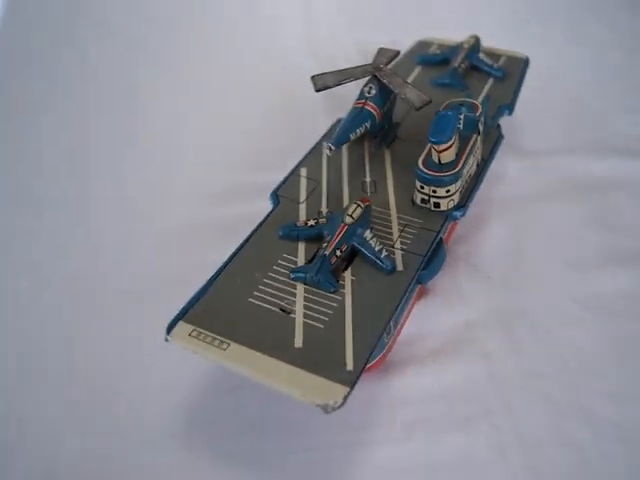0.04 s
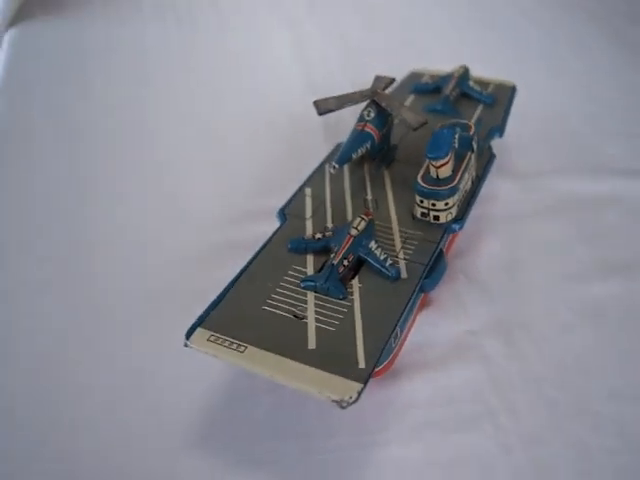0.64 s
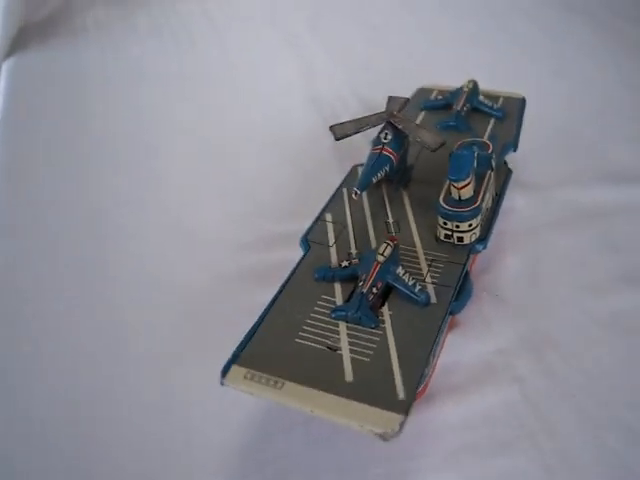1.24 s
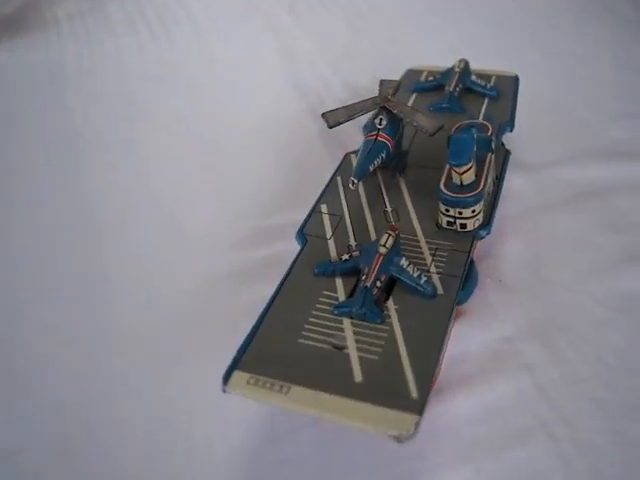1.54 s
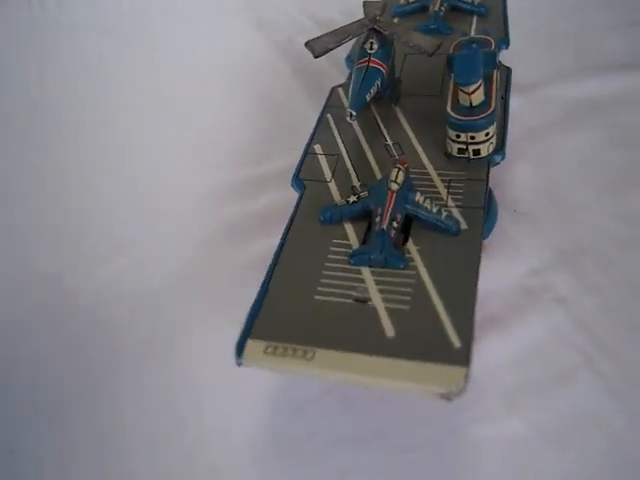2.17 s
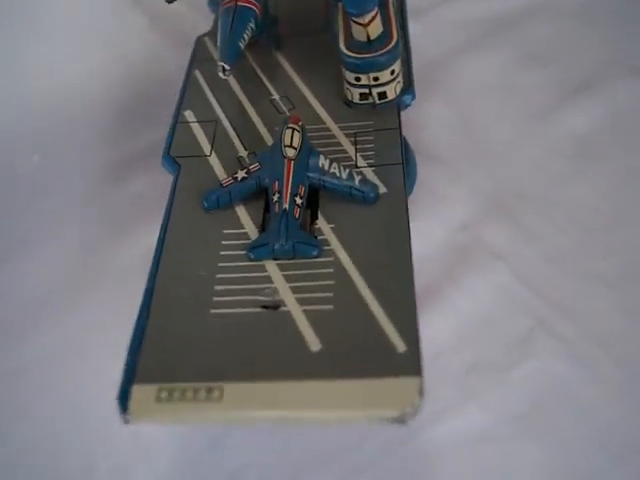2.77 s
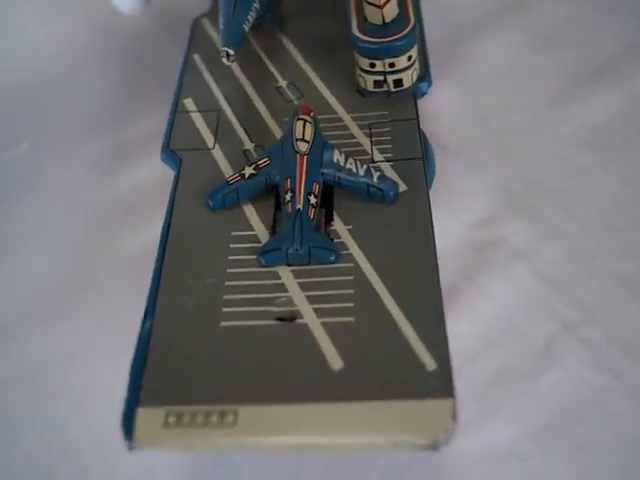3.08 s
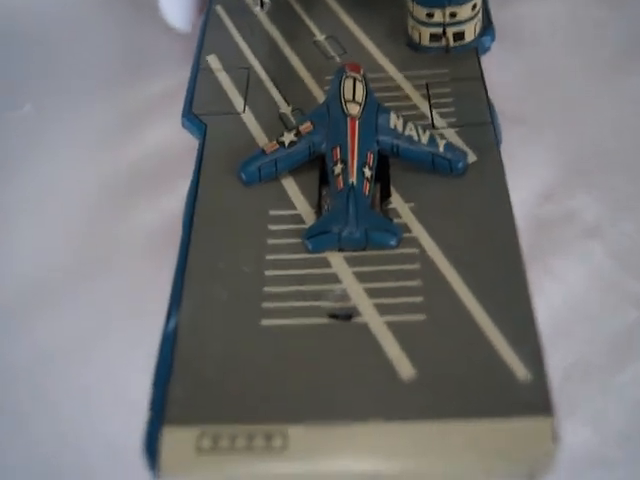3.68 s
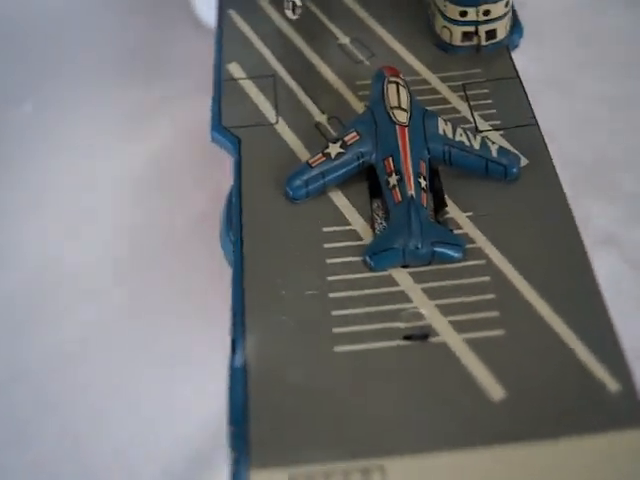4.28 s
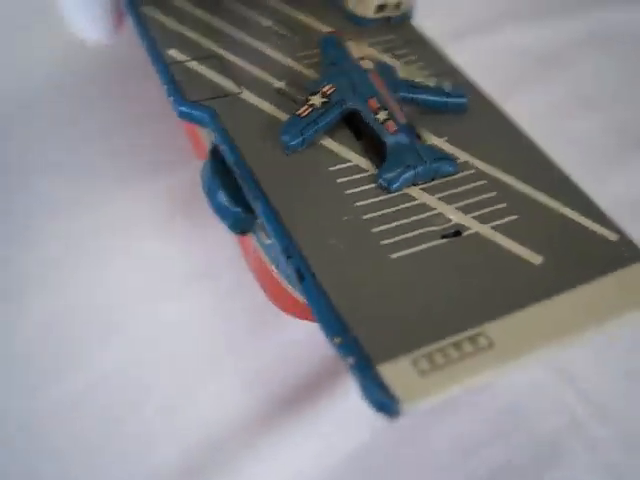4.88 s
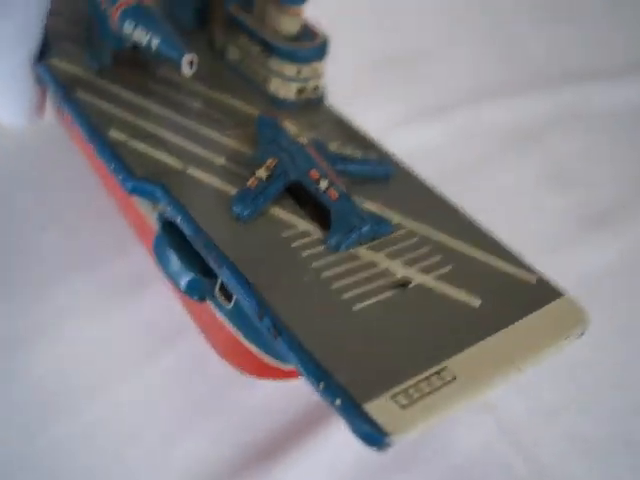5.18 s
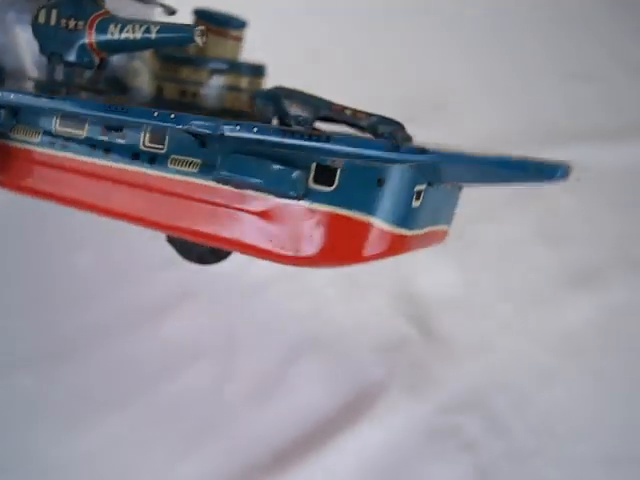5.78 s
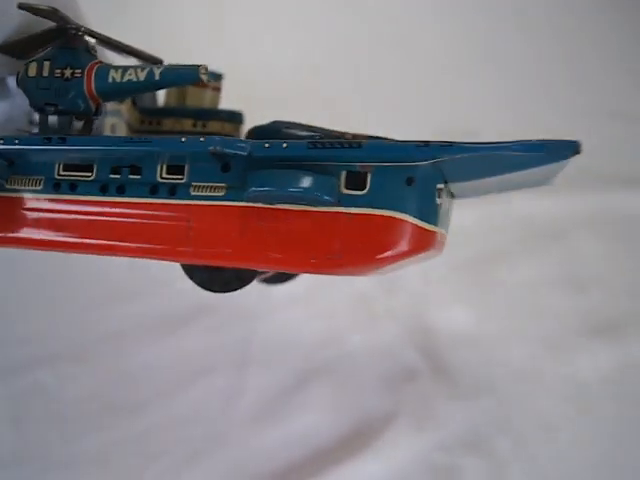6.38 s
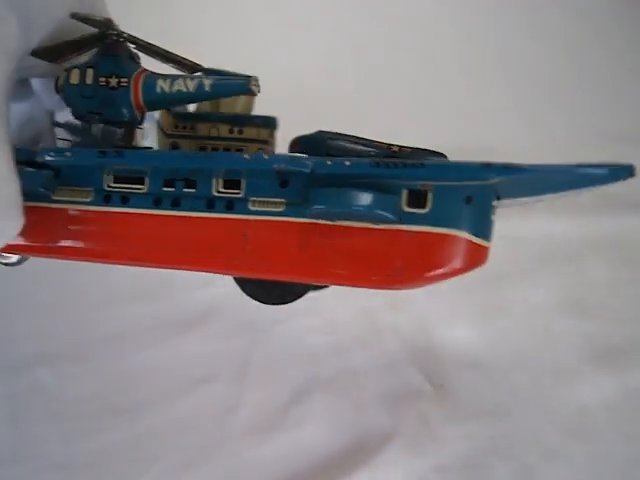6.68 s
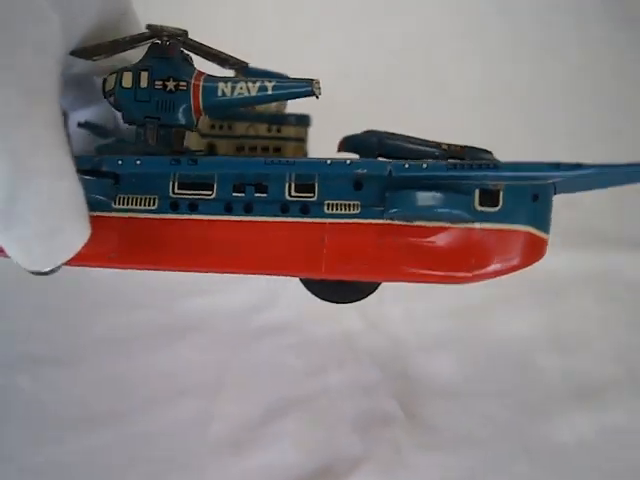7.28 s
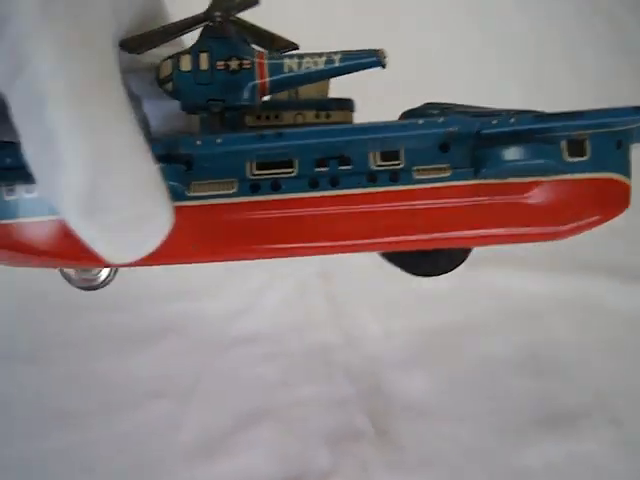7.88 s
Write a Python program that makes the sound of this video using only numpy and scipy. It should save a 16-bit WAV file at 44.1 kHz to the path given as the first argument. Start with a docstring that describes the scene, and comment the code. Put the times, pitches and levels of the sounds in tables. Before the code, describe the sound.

A faint hiss and the soft rub of a glove and cloth run throughout, as a tin toy is turned close to the microphone in a small, quiet room. A gritty scuff and a dull, light tap come at about 0.6 seconds, and another scuff at 1.6. The camera's autofocus stirs faintly at 1.2 seconds, then clicks irregularly from 1.9 to 3.9, quickest just before 3. Each move is a small scrape, a clack and a very short whirr ending in a tiny falling groan. At 3.7 seconds loose tin parts give a brief ringing clatter, the loudest moment, with more taps and a cloth rustle up to 4. Two tiny glove creaks and a scuff follow around 4.3 to 4.6. After a lull, focus clicks and whirrs return from 5.4 to 7 seconds, sharpest at 6.3 and 6.9. A last soft scuff comes at 7.6.

```python
"""A faint hiss and the rub of a glove and cloth come first: a hand turns a tin toy ship close to a camera
in a quiet room. Gritty scuffs swell and fade; loose tin parts tap and ring; the glove creaks on the tin.
The camera's autofocus keeps hunting: its gears scrape, take up with a clack, whirr briefly and brake with
a low falling groan. This vibration travels through the resonant housing to both microphone ports."""
import sys
import numpy as np
from scipy import signal
from scipy.fft import rfft, irfft, next_fast_len
from scipy.io import wavfile
from scipy.ndimage import uniform_filter1d, map_coordinates

SR = 44100
rng = np.random.default_rng(int(sys.argv[2]) if len(sys.argv) > 2 else 0)


def unload_wav(signal):
    """Save mono or channel-first audio to the path in sys.argv[1] as 16-bit WAV at rate SR, clipped to [-1, 1]."""
    wavfile.write(
        sys.argv[1],
        SR,
        np.round(np.clip(np.atleast_2d(signal).T, -1, 1) * 32767).astype(np.int16),
    )


N = 349713
T = np.arange(SR // 4) / SR  # time within one event, t/s


def amp(db):
    """Amplitude ratio of a level in decibels."""
    return 10 ** (np.asarray(db) / 20)

def unit(x, size=None):
    """Normalisation to rms 1 over the first size samples."""
    return x / np.sqrt(np.mean(x[..., :size] ** 2) + 1e-20)

def along(points, hz):
    """Interpolation of (f/Hz, value) points on a logarithmic frequency axis."""
    f, values = np.transpose(points)
    return np.interp(np.log(hz + 1), np.log(f + 1), values)

def wobble(rate):
    """Smooth random modulation, with rate knots a second."""
    knots = rng.standard_normal(int(N * rate / SR) + 4)
    return map_coordinates(knots, [np.arange(N) * rate / SR])

def filtered(x, response):
    """Linear filtering: the spectrum times a frequency response."""
    n = x.shape[-1]
    padded = 2 * next_fast_len(n // 2 + 4096)
    return irfft(rfft(x, padded) * response(np.fft.rfftfreq(padded, 1 / SR)), padded)[..., :n]

def causal(db):
    """The minimum-phase response with this gain."""
    cepstrum = irfft(np.log(amp(db) + 1e-6))
    half = len(cepstrum) // 2
    return np.exp(rfft(np.r_[cepstrum[0], 2 * cepstrum[1:half]], 2 * half))

def tilted(x, db_per_octave):
    """Spectral tilt: harder contacts are brighter."""
    return filtered(x, lambda hz: causal(db_per_octave * np.log2(np.clip(hz, 600, 7000) / 2000)))

def whitened(burst):
    """Whitening: a flatter force spectrum lets the struck body set the colour."""
    spectrum = rfft(burst, 2 * len(T))
    magnitude = np.abs(spectrum)
    return irfft(spectrum / (magnitude + .4 * magnitude.mean()))[:, :len(T)]

def add(track, start_s, sound):
    """Superposition of a sound on a track."""
    part = track[:, round(start_s * SR):][:, :sound.shape[-1]]
    part += sound[..., :part.shape[-1]]

# Notches of the port cavities: f/Hz, half-width/Hz, gain/dB
PORT_CAVITIES = [(1387, 167, -9.5), (2375, 154, -10.5), (3515, 280, -7)]
def ports(x):
    """Antiresonance: the hollows of the microphone ports absorb narrow bands."""
    gain_db = lambda f: sum(db * np.exp(-((f - hz) / width) ** 2) for hz, width, db in PORT_CAVITIES)
    return filtered(x, lambda f: causal(gain_db(f)))

# Likeness of left and right: f/Hz, correlation coefficient
CORRELATION = [(40, 1), (500, 0.41), (1000, 0.49), (1600, 0), (3000, 0.14), (4500, 0), (7000, 0.13),
               (12000, 0)]
def stereo_noise(spectrum):
    """Partial coherence: noise of rms 1, nearly mono in the bass."""
    def response(hz):
        angle = np.arccos(np.clip(along(CORRELATION, hz), -1, 1)) / 2
        return amp(along(spectrum, hz)) * [np.cos(angle), np.sin(angle)]
    mid, side = filtered(rng.standard_normal((2, N)), response)
    return unit(np.array([mid + side, mid - side]))

# Hiss spectrum: f/Hz, spectrum level/dB
HISS_SPECTRUM = [(20, 2), (95, -11.5), (135, -14), (175, -5), (520, 7), (610, -6), (980, -3.5), (1400, 1.5),
                 (1850, -2.5), (2400, -17), (3000, 2.5), (3500, -29), (4450, 1), (5900, -25), (7300, -9),
                 (14000, -21)]
def hiss(level_db=-62):
    """Stationary noise, coloured by the ports, forms a faint floor."""
    return amp(level_db) * ports(stereo_noise(HISS_SPECTRUM))

# Strength of rubbing: t/s, glove level/dB, cloth level/dB
RUBBING = [(0.0, -65.5, -60.5), (1.39, -64.5, -57.5), (1.99, -67, -62.5), (2.56, -69, -61.5),
           (2.98, -62, -64), (3.47, -60, -59.5), (3.75, -61.5, -54.5), (4.09, -58, -60), (4.44, -60.5, -63),
           (4.66, -68.5, -64), (5.3, -74, -63.5), (5.63, -65, -62), (6.67, -67, -60), (7.57, -65, -61.5),
           (7.93, -69, -62)]
# Pushes on the cloth: t/s, level/dB
CLOTH_PUSHES = [(.684, -53), (3.86, -45.5), (5.57, -60)]
# Friction spectra: f/Hz, spectrum level/dB
GLOVE_SPECTRUM = [(120, -47), (200, -7), (700, -9), (1700, -0.5), (4200, 0), (8000, -9), (14000, -40)]
CLOTH_SPECTRUM = [(100, -71), (220, -12), (480, -3.5), (620, -3), (800, 4.5), (1100, 4.5), (1400, -11),
                  (1900, -7.5), (4000, -6), (12000, -31.5)]
def glove_and_cloth(glove_gain_db=4.5, cloth_gain_db=-1, push_width_s=0.032):
    """Sliding friction: the glove rubs painted tin; the cloth rustles and swells where pushed."""
    t = np.arange(N) / SR
    times, *levels = np.transpose(RUBBING)
    glove_db, cloth_db = [np.interp(t, times, level) for level in levels]
    pushes = sum(amp(level) * np.exp(-.5 * ((t - at) / push_width_s) ** 2) for at, level in CLOTH_PUSHES)
    glove = amp(glove_db + glove_gain_db + 0.68 * wobble(rate=11)) * unit(stereo_noise(GLOVE_SPECTRUM))
    flutter = amp(2 * wobble(rate=25))
    cloth = (amp(cloth_db + cloth_gain_db) + pushes) * flutter * stereo_noise(CLOTH_SPECTRUM)
    return ports(glove + cloth)

# Spectrum of scuffs and gear scrapes: f/Hz, spectrum level/dB
SLIDE_SPECTRUM = [(130, -49), (250, 1), (600, -8), (1050, 3.5), (4300, 4), (6000, -4), (9000, -8.5),
                  (14000, -26.5)]
def slides(events, t60_s, grain_db=1.5):
    """Transient friction: gritty noise rises linearly and decays exponentially."""
    rise_s = 0.088 * t60_s
    shape = np.minimum(T / rise_s, 1) * amp(-60 * np.maximum(T - rise_s, 0) / t60_s)
    envelope = np.zeros((1, N))
    for peak_s, level in events:
        add(envelope, peak_s - rise_s, amp(level) * shape)
    return envelope * unit(ports(stereo_noise(SLIDE_SPECTRUM)) * amp(grain_db * wobble(rate=330)))

# Short gritty scuffs: t/s, level/dB
SCUFFS = [(0.568, -45), (1.569, -43.5), (3.567, -43), (3.878, -44), (4.567, -46), (4.592, -51), (4.85, -59),
          (5.08, -59), (6.381, -52), (6.568, -45), (7.569, -50)]
def scuffs():
    """Amplitude-modulated noise: short gritty scuffs swell and fade."""
    return slides(SCUFFS, t60_s=0.17)

# Loose parts striking the deck: t/s, level/dB, tilt/(dB per octave)
TIN_IMPACTS = [(0.6597, -50.5, -10.5), (0.673, -47.5, -10), (3.332, -54, -3.5), (3.667, -45, 5),
               (3.672, -25.5, 3.5), (3.676, -38, 0.5), (3.685, -39, 3), (3.696, -41, -5),
               (3.7167, -38.5, -3.5), (3.854, -41.5, -1.5), (3.875, -40.5, -1.5), (3.9871, -34, 4.5),
               (4.323, -48.5, 6), (4.332, -49, -5.5), (4.538, -53, -6.5)]
# Modes of the tin sheet: f/Hz, level/dB, T60/s
TIN_MODES = [(233, -21.5, 0.44), (530, -15, 0.13), (942, 1.5, 0.12), (1080, 2, 0.12), (1199, 1.5, 0.32),
             (1294, 1.5, 0.1), (1609, 8, 0.085), (1720, 4, .05), (1895, 15, 0.042), (1947, 9, 0.073),
             (2267, 0.5, 0.12), (2696, 0, 0.14), (3020, -5, 0.057), (3764, 12, 0.056), (3840, 10, 0.035),
             (4060, 21.5, 0.0068), (4380, 6, 0.019), (4920, -4, 0.032), (7900, -6, 0.045),
             (9700, -11, 0.025)]
# Contact noise: f/Hz, spectrum level/dB
CRACK_SPECTRUM = [(120, -43), (260, -14.5), (600, -8), (1200, 2), (1900, -1), (2700, -9.5), (3200, -4.5),
                  (4000, 5.5), (6000, -14), (8000, -13.5), (14000, -41)]
def tin_taps(crack_t60_s=0.029, crack_db=-1, gain_db=0.4, attack_s=0.00042):
    """Impact excitation: each contact cracks and rings the sheet's damped modes at new strengths."""
    out = np.zeros((2, N))
    hz, db, t60 = np.transpose(TIN_MODES)[:, :, None]
    for start, level, tilt in TIN_IMPACTS:
        strength = amp(db + 2 * rng.standard_normal(hz.shape))
        phase = 2 * np.pi * rng.random(hz.shape)
        # loose seams blur the ring
        drift = np.cumsum(rng.standard_normal((len(hz), len(T))), 1) * 0.042 * np.sqrt(hz / 2000)
        modes = strength * amp(-60 * T / t60) * np.sin(2 * np.pi * hz * T + phase + drift)
        ring = modes.sum(0) * (1 - np.exp(-T / attack_s))
        contact = rng.standard_normal(len(T)) + .5 * rng.standard_normal((2, len(T)))  # nearly mono
        contact *= amp(-60 * T / crack_t60_s)
        crack = ports(filtered(contact, lambda f: causal(along(CRACK_SPECTRUM, f))))
        tap = unit(ring, size=882) + amp(crack_db) * unit(crack, size=882)
        add(out, start, amp(level + gain_db) * unit(tilted(tap, tilt), size=882))
    return out

# Focus moves, each a scrape, clack, whirr and brake: t/s, duration/s, scrape level/dB, clack level/dB,
# clack tilt/(dB per octave), barrel f/Hz, brake level/dB
FOCUS_MOVES = [(1.1945, 0.1, -58, -49.5, -6, 1110, -44), (1.903, 0.053, -39.5, -32, 1.5, 1930, -50),
               (2.2973, 0.069, -57, -36, -5, 1120, -54.5), (2.565, 0.051, -44.5, -34, -2, 2020, -49),
               (2.631, 0.018, -55, -38.5, -4.5, 2010, -48.5), (2.766, 0.052, -52, -35.5, -2.5, 1930, -50),
               (2.832, 0.02, -51, -39, -3, 1900, -55), (2.851, 0.012, -44, -37.5, -1.5, 870, -56),
               (2.9665, 0.05, -59, -32.5, -1.5, 2000, -50), (3.0325, .009, -57, -30.5, -1.5, 1940, -66),
               (3.0414, 0.011, -52, -35, -2, 1940, -52), (3.5011, 0.064, -47, -32, -1, 900, -49.5),
               (3.72, 0.14, -60, -35, -0.5, 880, -44.5), (3.851, .02, -51, -36, 0, 3020, -57),
               (5.423, 0.14, -42, -39, -3.5, 1260, -58), (5.934, 0.11, -69, -54.5, -5, 1690, -46),
               (6.052, 0.032, -70, -47, -9, 1960, -45.5), (6.346, 0.049, -35, -32, -1.5, 2040, -50),
               (6.4747, 0.053, -39.5, -42, -5, 920, -46), (6.674, 0.16, -52, -55, 3, 1960, -44),
               (6.9266, 0.12, -34.5, -32.5, -1.5, 1990, -48.5)]
def gear_scrapes(lead_s=0.0035):
    """Sliding friction: the gears slip just before they catch."""
    return slides([(start - lead_s, level) for start, _, level, *_ in FOCUS_MOVES], t60_s=0.077)

# Housing modes: f/Hz, half-width/Hz, level in a clack/dB, level in a whirr/dB
HOUSING_MODES = [(266, 54, 0, -7), (503, 53, 5.5, 4.5), (798, 80, 10, 6.5), (1042, 310, 6, 5),
                 (1590, 170, 6.5, 2.5), (1980, 177, 9.5, 0), (2687, 125, 11, 9), (3027, 290, 11, 7.5),
                 (3770, 260, 11, 8.5), (4270, 450, 7.5, -7), (5580, 1130, -4, -10.5),
                 (8660, 840, -16.5, -18.5)]
def housing(x, column, cutoff_hz=190):
    """Structure-borne sound: the camera body passes its resonances and little bass."""
    def response(f):
        power = sum((amp(db[column]) / (1 + ((f - hz) / width) ** 2)) ** 2
                    for hz, width, *db in HOUSING_MODES)
        high_pass = (f / cutoff_hz) ** 4 / (1 + (f / cutoff_hz) ** 4) + .01
        return causal(10 * np.log10(power * high_pass))
    return filtered(x, response)

def focus_clacks(attack_s=0.0006, blow_s=.0042, rattle_db=-23, rattle_t60_s=0.2,
                 barrel_db=6.5, barrel_octaves=0.14):
    """Impact excitation: chattering gear teeth knock the lens barrel and the housing into resonance."""
    out = np.zeros((2, N))
    envelope = np.exp(-(T / blow_s) ** 2) + amp(rattle_db - 60 * T / rattle_t60_s)
    for start, _, _, level, tilt, barrel_hz, _ in FOCUS_MOVES:
        # the paths to the two ports are partly shared
        chatter = rng.standard_normal((2, len(T))) + 1.07 * rng.standard_normal(len(T))
        force = whitened(chatter * envelope) * (1 - np.exp(-T / attack_s))
        peak = lambda f: np.exp(-(np.log2((f + 1) / barrel_hz) / barrel_octaves) ** 2)
        knock = filtered(force, lambda f: causal(barrel_db * peak(f)))
        clack = ports(tilted(housing(knock, column=0), tilt))
        add(out, start, amp(level) * unit(clack, size=530))
    return out

def focus_whirr(drive_db=-50.5, ease_db_per_s=34, fade_db=4, grain_db=3,
                overrun_s=0.0079, strain_db=-4.5, strain_s=0.0069):
    """Forced vibration: gear teeth grind on the housing, hardest as the motor starts and brakes."""
    drive = np.zeros((1, N))
    for start, duration, *_, brake_db in FOCUS_MOVES:
        t = T[T < duration + overrun_s]
        move_db = drive_db - ease_db_per_s * duration  # longer moves are driven more gently
        running = amp(move_db + fade_db * (1.35 - t / t[-1]))
        strain = amp(brake_db + strain_db) * np.exp(-.5 * ((t - duration) / strain_s) ** 2)
        add(drive, start, running + strain)
    teeth = rng.standard_normal((2, N)) + 0.56 * rng.standard_normal(N)
    teeth *= amp(grain_db * wobble(rate=600))
    return uniform_filter1d(drive, size=220) * unit(ports(housing(teeth, column=1)))

def focus_brakes(pitch_hz=510, fall_per_s=9, rise_s=0.0065, decay_s=0.011, lead_s=.03,
                 roughness=0.2, firm_db=-41):
    """Falling glide: the slowing motor sweeps down through a low resonance of the housing."""
    out = np.zeros((2, N))
    t = T - lead_s
    envelope = np.exp(-.5 * (t / np.where(t < 0, rise_s, decay_s)) ** 2)
    grit_spectrum = [(100, -54), (230, 3.5), (600, 7.5), (3000, -29)]  # f/Hz, level/dB
    port_phase = np.array([[0], [.8]])
    for start, duration, *_, level in FOCUS_MOVES:
        pitch = pitch_hz * np.exp(-fall_per_s * t + 0.0327 * rng.standard_normal())
        phase = 2 * np.pi * (np.cumsum(pitch) / SR + rng.random())
        grit = unit(filtered(rng.standard_normal((2, len(T))), lambda f: amp(along(grit_spectrum, f))))
        grit_gain = roughness * amp(firm_db - level)  # a gentle stop is more thud than tone
        groan = unit(np.sin(phase + port_phase) + grit_gain * grit)
        add(out, start + duration - lead_s, amp(level) * groan * envelope)
    return out

# Creaks of the glove on the tin: t/s, f/Hz, level/dB
CREAKS = [(4.334, 953, -48.5), (4.407, 920, -47.5), (5.581, 1096, -55)]
def glove_creaks(width_s=0.01, lead_s=0.033):
    """Stick-slip friction: a short, rough tone swells out of the rubbed sheet."""
    out = np.zeros((2, N))
    envelope = np.exp(-.5 * ((T - lead_s) / width_s) ** 2)
    for peak_s, hz, level in CREAKS:
        slip = .075 * np.cumsum(rng.standard_normal(len(T)))
        add(out, peak_s - lead_s, amp(level) * unit(np.sin(2 * np.pi * hz * T + slip)) * envelope)
    return out

# Reverberation times of the small room: f/Hz, T60/s
ROOM_DECAY = [(200, 0.48), (1200, 0.12), (4000, 0.17), (12000, 0.22)]
def room(x, delay_samples=220):
    """Reverberation: a diffuse tail in which each frequency decays at its own rate."""
    hz, t, spectra = signal.stft(rng.standard_normal((2, SR // 2)), SR, nperseg=256)
    decay = amp(-60 * t / along(ROOM_DECAY, hz)[:, None])
    tail = signal.istft(spectra * decay, SR, nperseg=256)[1]
    tail = np.pad(tail / np.linalg.norm(tail[0]), ((0, 0), (delay_samples, 0)))
    return ports(signal.fftconvolve(x, tail, axes=1)[:, :N])

def left_delayed(x, samples=5):
    """Path difference: the lens reaches the left port later."""
    return np.array([np.pad(x[0], (samples, 0))[:N], x[1]])

def scene():
    """Superposition: the toy in front, the lens nearer the right port, hiss under all."""
    toy = (tin_taps() + glove_creaks()) * amp([[-.5], [.5]])
    lens = left_delayed(focus_clacks() + focus_whirr() + focus_brakes()) * amp([[-1.7], [1.5]])
    reverberation = amp(-5.5) * room(toy) + amp(-11) * room(lens)
    friction = gear_scrapes() + glove_and_cloth() + scuffs()
    return toy + lens + reverberation + friction + hiss()

def record(dry, top_hz=14200, offset=-.0025):
    """Band limiting: the camera cuts the top treble and adds a small constant offset."""
    return filtered(dry, lambda hz: hz < top_hz) + offset


dry = scene()
out = record(dry)
unload_wav(out)
```